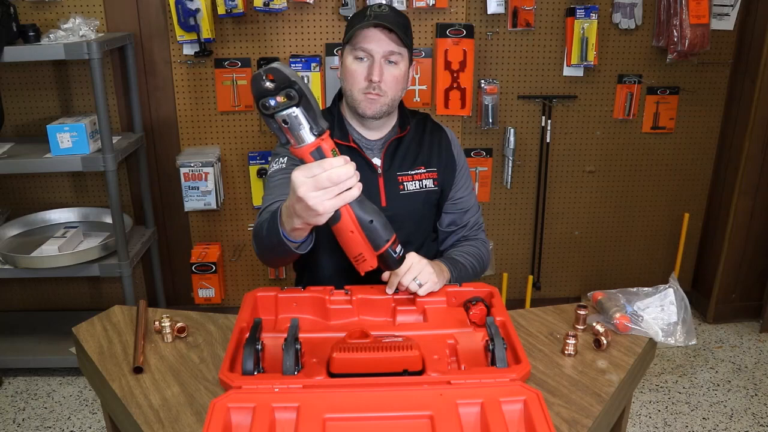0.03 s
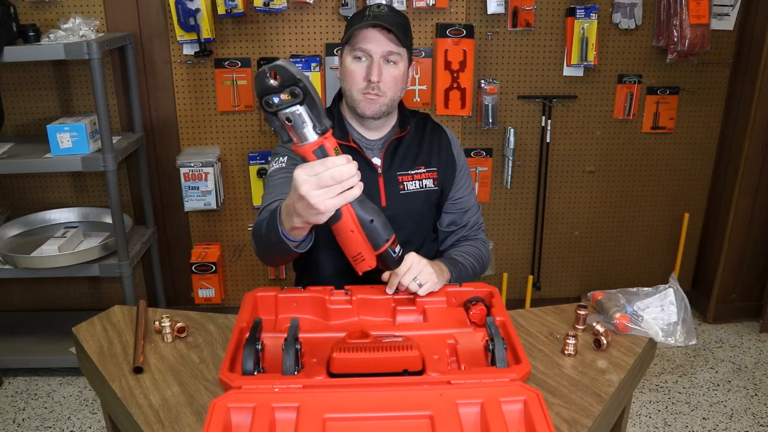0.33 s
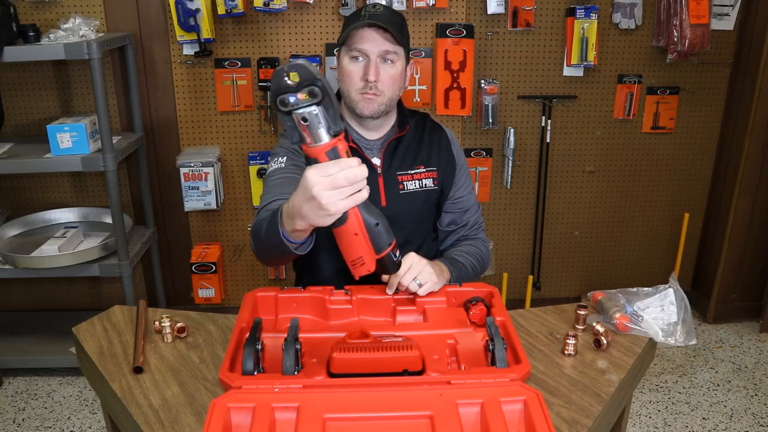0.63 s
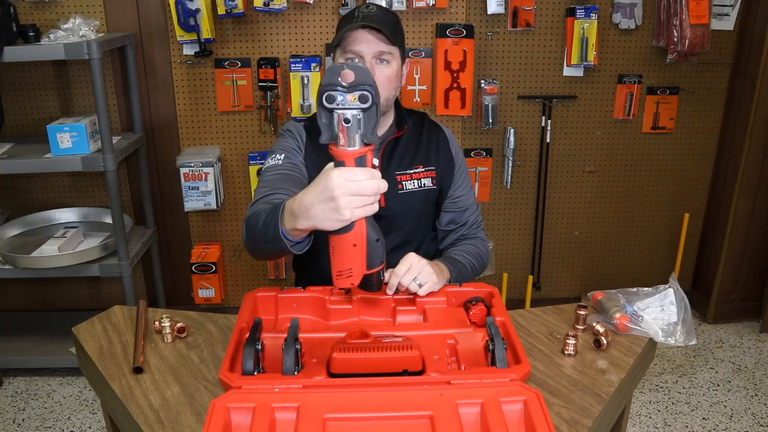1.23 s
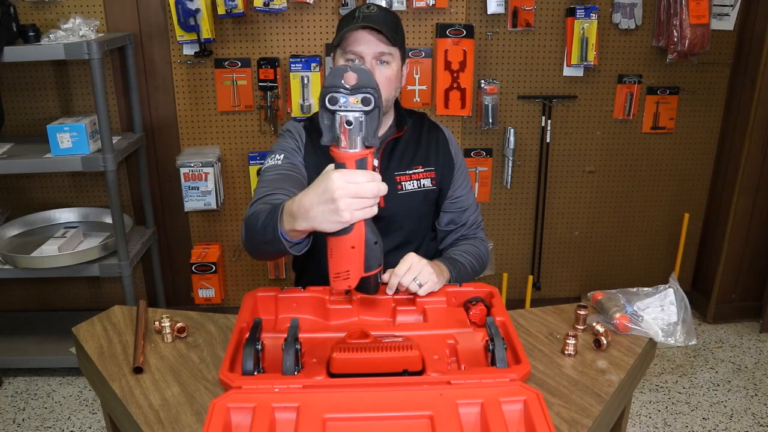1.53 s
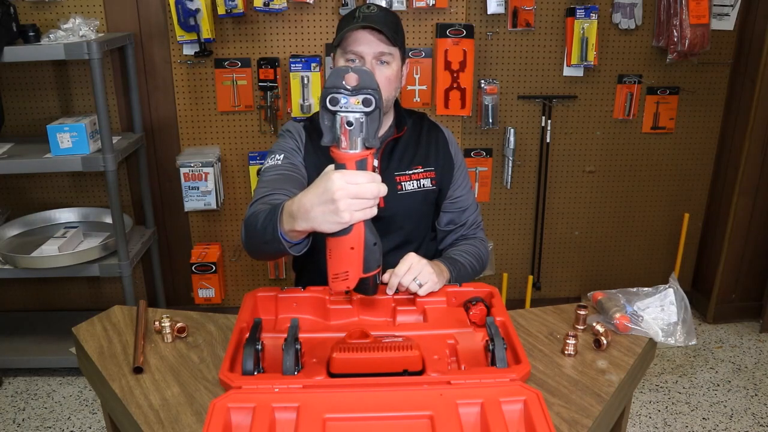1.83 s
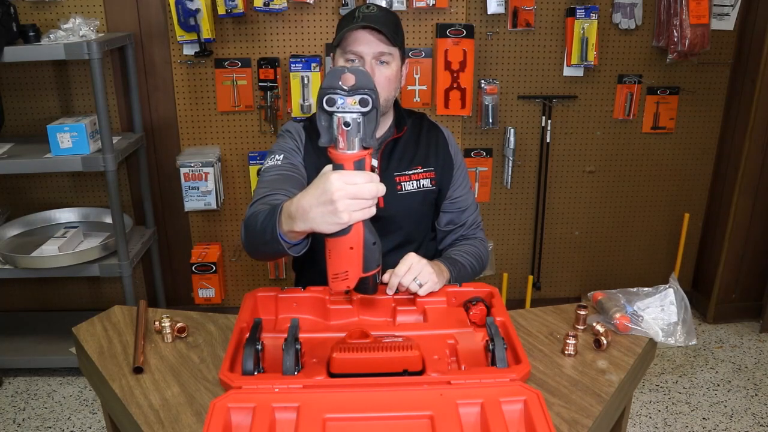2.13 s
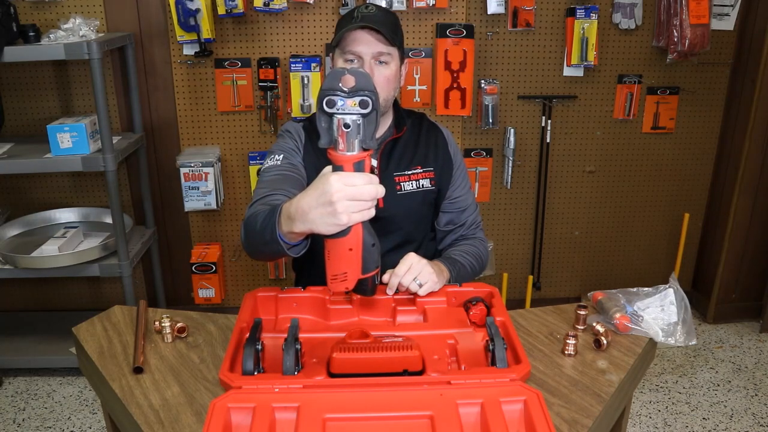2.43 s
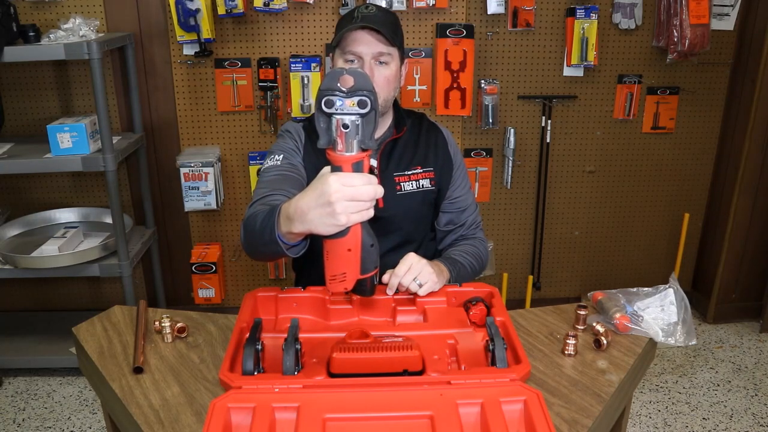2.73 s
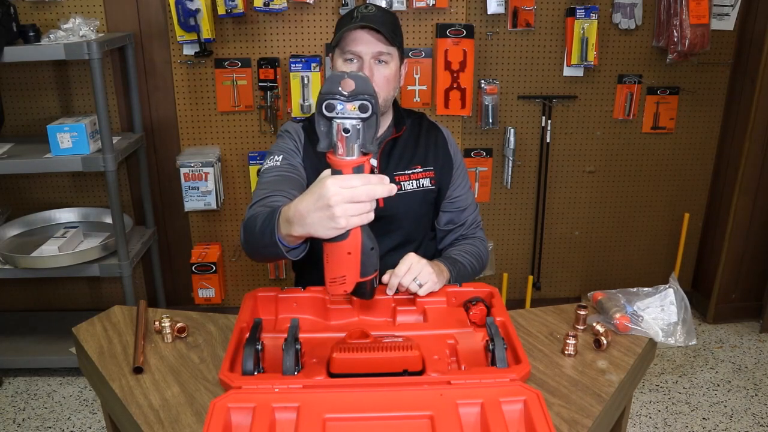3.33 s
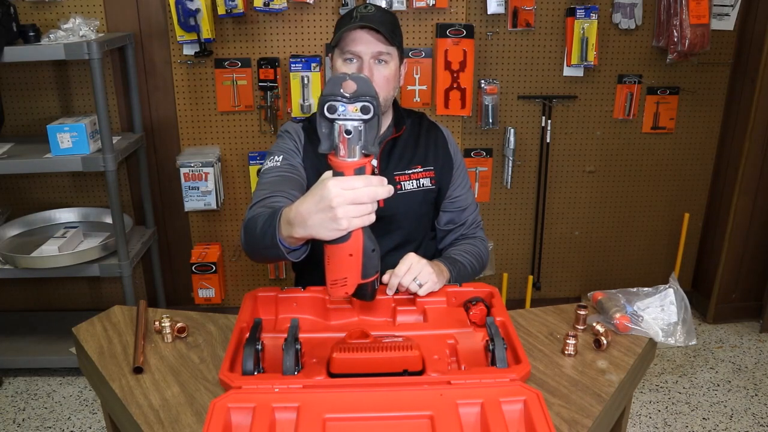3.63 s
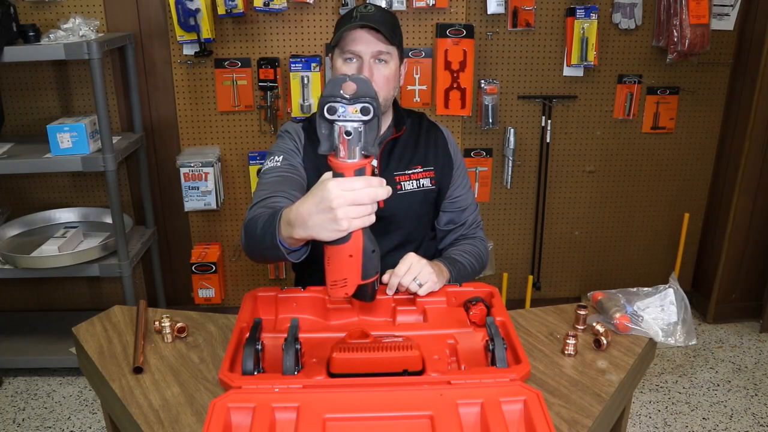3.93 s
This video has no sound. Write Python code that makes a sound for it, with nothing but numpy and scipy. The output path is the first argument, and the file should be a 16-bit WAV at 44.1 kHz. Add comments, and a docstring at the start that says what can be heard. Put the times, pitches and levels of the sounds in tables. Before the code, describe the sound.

Close to the microphone in a small workshop, a cordless press tool spins up and holds a fast, pulsing whine with a rattle. Then it meets resistance, dropping in pitch and turning hoarse and choppy over faint room rumble.

```python
"""A pulsing gear whine over a rattle and a motor hum: a cordless press tool runs in a small workshop.
The motor drives a piston pump through a planetary gear, which whines in one burst per pump stroke.
Near 3 s the jaws meet resistance: the motor sags and every stroke brakes it, so the whine
breaks into falling chirps over a hoarse rattle. The room rumbles faintly underneath."""
import sys
import numpy as np
from scipy import signal
from scipy.fft import rfft, irfft
from scipy.io import wavfile
from scipy.ndimage import uniform_filter1d

SR = 44100
rng = np.random.default_rng(int(sys.argv[2]) if len(sys.argv) > 2 else 0)


def master_out(mix):
    """Clip the mix to full scale and print it as 16-bit PCM to the path in sys.argv[1]."""
    frames = np.transpose(np.atleast_2d(mix))
    ceiling = np.clip(frames, -1, 1)
    pcm = np.round(ceiling * 32767).astype(np.int16)
    wavfile.write(sys.argv[1], SR, pcm)


N = 176400
T = np.arange(N) / SR
HZ = np.fft.rfftfreq(N, 1 / SR)


def amp(db):
    """Decibels to gain."""
    return 10 ** (np.asarray(db) / 20)


def unit(x):
    """Scale to rms 1."""
    return x / np.sqrt(np.mean(abs(x) ** 2) + 1e-20)


def curve(table, column=1):
    """One column of a time table, per sample."""
    rows = np.array(table, float)
    return np.interp(T, rows[:, 0], rows[:, column])


def at_hz(table, hz):
    """Interpolate a table over log frequency."""
    table_hz, value = np.transpose(table)
    return np.interp(np.log(hz + 1), np.log(table_hz + 1), value)


def colour(x, spectrum):
    """Filter by a spectrum table, to rms 1."""
    return unit(irfft(rfft(x) * amp(at_hz(spectrum, HZ)), N))


def wander(fastest_hz, slowest_hz=0):
    """Random drift, rms 1, rolling off outside the two rates."""
    real, imag = rng.standard_normal((2, 12000))
    hz = HZ[:len(real)] + 1e-6
    highpass = hz / np.hypot(hz, slowest_hz)
    lowpass = 1 / np.sqrt(1 + (hz / fastest_hz) ** 4)
    return unit(irfft((real + 1j * imag) * highpass * lowpass, N))


def rough_tone(cycles, width_hz):
    """A tone smeared into a narrow noise band."""
    a, b = (wander(width_hz, slowest_hz=25) for _ in range(2))
    return a * np.cos(2 * np.pi * cycles) + b * np.sin(2 * np.pi * cycles)


def levelled(envelope):
    """Even out an envelope's mean power, keeping its pulses."""
    return envelope / np.sqrt(uniform_filter1d(envelope ** 2, size=6000))


def pulse(stroke, at, width):
    """One bump of height 1 per stroke; at and width in strokes."""
    return np.exp(-(np.sin(np.pi * (stroke - at)) / (np.pi * width)) ** 2 / 2)


def noise_dropout(at_s=1.104, width_s=.009, depth_db=-16):
    """Gain for one brief dropout in the noise."""
    return amp(depth_db * np.exp(-((T - at_s) / width_s) ** 2))


def room_rumble():
    """Faint low noise of the room."""
    # Each row: time in seconds, level in dB.
    level_db = [(0, -42), (1.2, -41), (2, -42), (4, -45.5)]
    # Each row: frequency in Hz, relative density in dB.
    spectrum = [(15, -1.5), (25, -2.5), (38, -4.5), (56, 2.5), (80, 2.5), (100, -2.5), (120, -2),
                (160, -9.5), (300, -11), (700, -39)]
    return amp(curve(level_db)) * colour(rng.standard_normal(N), spectrum)


def workshop_reverb(x, tail_samples=22050):
    """Bench and walls return a short, dense tail."""
    # Each row: frequency in Hz, T60 in seconds.
    t60_s = [(200, 0.23), (2500, 0.19), (14000, .2)]
    onset = np.clip(T[:tail_samples] / 0.0013 - .5, 0, 1)
    hz, time_s, bands = signal.stft(rng.standard_normal(tail_samples) * onset, SR, nperseg=256)
    decay = amp(-60 * time_s / at_hz(t60_s, hz)[:, None])
    tail = signal.istft(bands * decay, SR, nperseg=256)[1]
    return signal.fftconvolve(x, tail / np.linalg.norm(tail))[:N]


def drive(gear_ratio=5.906, full_load_swing=.12):
    """The motor turns the planet carrier once per stroke; load brakes it within each stroke."""
    # Each row: time in seconds, mean motor speed in turns per second.
    motor_hz = [(0.0, 235.0), (0.05, 280.51), (0.12, 297.47), (0.22, 307.98), (0.45, 312.46), (0.7, 313.46),
                (1.0, 316.69), (1.3, 319.78), (1.7, 322.24), (2.25, 323.22), (2.6, 322.35), (2.9, 318.78),
                (3.02, 300.36), (3.2, 278.09), (3.45, 254.53), (3.65, 237.6), (3.82, 229.22), (4.0, 206.13)]
    # Each row: time in seconds, hydraulic load from 0 to 1.
    hydraulic_load = [(0, 0.06), (2.85, 0.04), (3.0, 0.24), (3.17, 0.45), (3.4, 0.67), (3.65, 0.77),
                      (4, 0.88)]
    load = curve(hydraulic_load)
    stroke = .708 + np.cumsum(curve(motor_hz)) / SR / gear_ratio  # count at mean speed
    brake_phase = stroke - 0.187 + 0.209 * load  # load brakes earlier in the stroke
    carrier_turns = stroke + full_load_swing * load * np.cos(2 * np.pi * brake_phase) / (2 * np.pi)
    return stroke, carrier_turns, gear_ratio * carrier_turns, load


def planet_flutter_db(stroke, load):
    """The turning planets give the gear whine a slower and a faster flutter, less under load."""
    planet_turns = 54 / 21 * stroke
    slow_flutter_db = 2.8 * np.cos(2 * np.pi * (planet_turns - stroke + .14))
    fast_flutter_db = 1.4 * np.cos(2 * np.pi * (planet_turns - .1))
    return (slow_flutter_db + fast_flutter_db) * np.clip(1 - 1.5 * load, .15, 1)


def pump_groan(stroke, load, ring_hz=620):
    """Under pressure the pump body groans on each return stroke."""
    envelope = levelled(0.36 + pulse(stroke, at=0.24, width=0.21))
    return amp(-33) * load ** 2 * rough_tone(ring_hz * T, width_hz=60) * envelope


def motor_hum(shaft_turns):
    """Clean tones at multiples of the shaft rate, each wavering in level."""
    # Each row: time in seconds, then levels in dB of orders 1, 2, 3 and 12.
    main_db = [(0, -48, -44, -35, -55), (.15, -41, -50, -36, -43), (.4, -38.5, -54, -41, -36.5),
               (.7, -39, -48.5, -46.5, -43), (.9, -37.5, -45.5, -53, -34), (1.25, -35.5, -44.5, -43, -36),
               (1.7, -34, -44, -37.5, -31), (2.9, -34, -45, -39, -35.5), (3.1, -45.5, -48.5, -43, -42),
               (3.5, -47.5, -42.5, -42, -44), (3.8, -53.5, -44, -36, -48), (4, -58, -49.5, -37.5, -44)]
    # Each row: order, level in dB relative to order 1.
    weak_orders = [(4, -6), (6, -7.5), (11, -14.5), (21, -6)]
    turns = shaft_turns + .004 * wander(25)
    tones = [(order, curve(main_db, column)) for column, order in enumerate((1, 2, 3, 12), 1)]
    tones += [(round(order), curve(main_db) + db) for order, db in weak_orders]
    return sum(np.sqrt(2) * amp(db + 1.1 * wander(8.5)) * np.sin(2 * np.pi * order * turns)
               for order, db in tones)


def gear_rattle(stroke, load, flutter_db):
    """Dense tooth knocks ring the housing, harder during each push and darker under load."""
    # Each row: frequency in Hz, relative density in dB.
    free_spectrum = [(150, -22), (420, -8.5), (620, -4.5), (800, -8.5), (1100, -4), (1350, 0.5), (2150, -3),
                     (2650, 6.5), (3150, -0.5), (3700, -8), (4700, -2), (6300, 1), (7400, -9.5),
                     (8700, -4.5), (10000, -10.5), (11700, -7.5), (13000, -15), (15500, -13.5)]
    loaded_spectrum = [(150, -39), (330, -19), (440, -13), (600, -8.5), (760, -9.5), (1100, -9),
                       (1500, 2.5), (2100, 0), (2450, 1), (2750, 9), (3400, -7.5), (4500, -4.5),
                       (6300, -2.5), (7600, -12), (8900, -10.5), (10700, -17.5), (12200, -10), (13500, -17),
                       (15500, -15.5)]
    # Each row: time in seconds, level in dB.
    level_db = [(0, -23), (1, -23.5), (2.85, -22), (3.15, -22), (3.5, -20.5), (3.75, -20), (4, -23)]
    knocks = rng.standard_normal(N) * amp(2.17 * wander(470))
    push_db = (4 + 15 * load) * pulse(stroke, at=0.0077, width=0.45)
    knocks *= levelled(amp(push_db + 0.14 * flutter_db))
    blend = np.clip(2.2 * load - .08, 0, 1)
    rattle = (1 - blend) * colour(knocks, free_spectrum) + blend * colour(knocks, loaded_spectrum)
    return amp(curve(level_db)) * rattle


def housing(x):
    """Shell resonances lift the mesh tones that pass through them."""
    # Each row: frequency in Hz, width in Hz, peak gain in dB.
    modes = [(2626, 89, 6.5), (4080, 103, 7.5), (5190, 140, 5.5), (6450, 320, 1), (8980, 230, 5.5),
             (11800, 640, 0)]
    response = 1 + sum((amp(db) - 1) / (1 + 2j * (HZ - hz) / width_hz) for hz, width_hz, db in modes)
    return irfft(rfft(x) * response, N)


def gear_whine(stroke, carrier_turns, load, flutter_db):
    """Mesh tones, roughened by uneven tooth contact, swell as the piston pushes."""
    # Each row: cycles per stroke before rounding, unloaded noise share from 0 to 1, noise width in Hz.
    mesh_tones = [(53, 0.12, 256), (108.4, 0.45, 260), (159.4, 0.69, 290)]
    # Each row: time in seconds, then levels in dB of mesh tones 1, 2 and 3 ahead of the housing.
    mesh_db = [(0, -24.5, -33, -33), (.03, -26, -29, -35), (.07, -23, -26, -37), (.25, -24.5, -27, -31),
               (.75, -23.5, -23.5, -33.5), (1.15, -23, -25, -33), (1.9, -21.5, -24.5, -34),
               (2.55, -22, -25.5, -33), (2.78, -29, -24, -32), (2.92, -24.5, -20.5, -31.5),
               (3.05, -22.5, -28, -36), (3.2, -23, -31.5, -40), (3.33, -24, -29, -31.5),
               (3.62, -29, -28, -28.5), (3.85, -31, -25.5, -27.5), (4, -26, -32, -26)]
    # Each row: cycles per stroke before rounding, level in dB relative to tone 3, width in Hz.
    overtones = [(217.4, -8, 300), (268, -11.5, 610)]
    strain = np.clip(3 * load, 0, 1)
    swell_db = (8.25 + 8 * strain + 1.5 * load) * pulse(stroke, at=-.005 - 0.0069 * load, width=0.14)
    whine = 0
    for k, (per_stroke, noise_share, width_hz) in enumerate(mesh_tones):
        jitter_cycles = 0.038 * (0.49 + strain) * wander(74)
        cycles = round(per_stroke) * carrier_turns + jitter_cycles
        noise_share *= 1 - 0.29 * strain
        clean = np.sqrt(2 * (1 - noise_share)) * np.sin(2 * np.pi * cycles)
        rough = np.sqrt(noise_share) * rough_tone(cycles, width_hz)
        depth = 1 - 0.27 * k * (1 - load)
        bursts = levelled(amp(depth * (swell_db + flutter_db)))
        whine += (clean + rough) * amp(curve(mesh_db, column=k + 1)) * bursts
    overtone_bursts = levelled(amp(0.42 * strain * swell_db))
    for per_stroke, db, width_hz in overtones:
        tone = rough_tone(round(per_stroke) * carrier_turns, width_hz)
        whine += tone * amp(db + curve(mesh_db, column=3)) * overtone_bursts
    return housing(whine)


def scene():
    """The tool close by, reflections of its gears and pump, and room rumble; mono."""
    stroke, carrier_turns, shaft_turns, load = drive()
    flutter_db = planet_flutter_db(stroke, load)
    mechanism = gear_whine(stroke, carrier_turns, load, flutter_db)
    mechanism += gear_rattle(stroke, load, flutter_db) * noise_dropout()
    mechanism += pump_groan(stroke, load)
    room = room_rumble() + amp(-12) * workshop_reverb(mechanism)
    return (room + motor_hum(shaft_turns) + mechanism)[None]


def record(dry):
    """Steep low-pass at the top of the treble."""
    cutoff_hz = 15720
    lowpass = signal.firwin(801, cutoff_hz, window=("kaiser", 9), fs=SR)
    return signal.oaconvolve(dry, lowpass[None], "same")


dry = scene()
out = record(dry)
master_out(out)
```